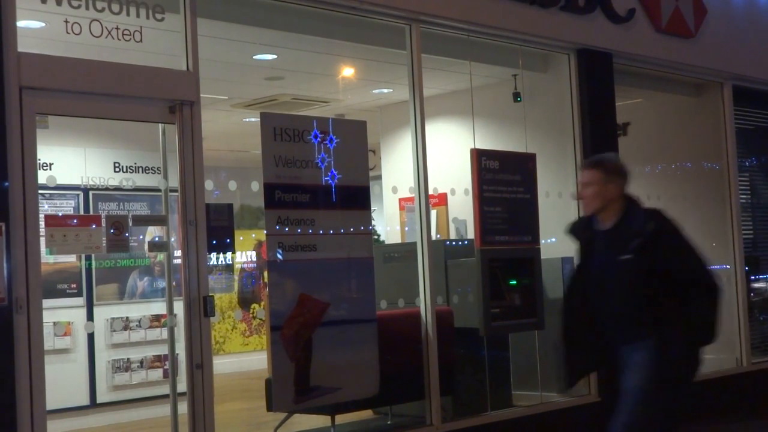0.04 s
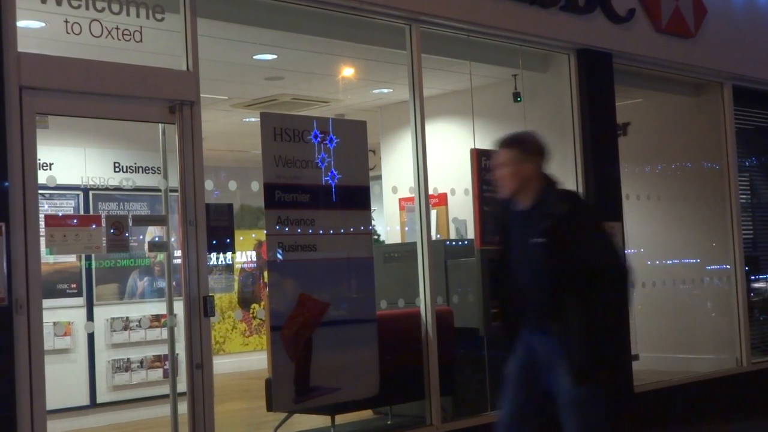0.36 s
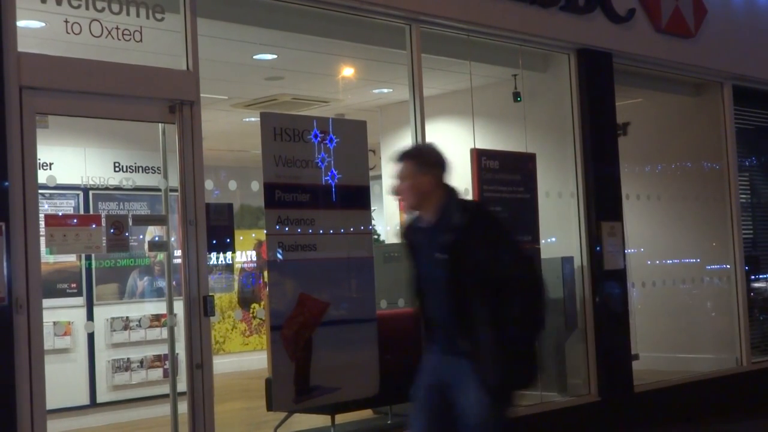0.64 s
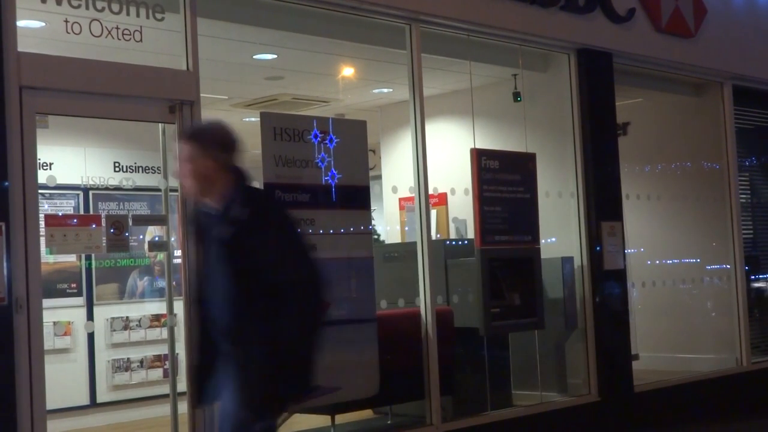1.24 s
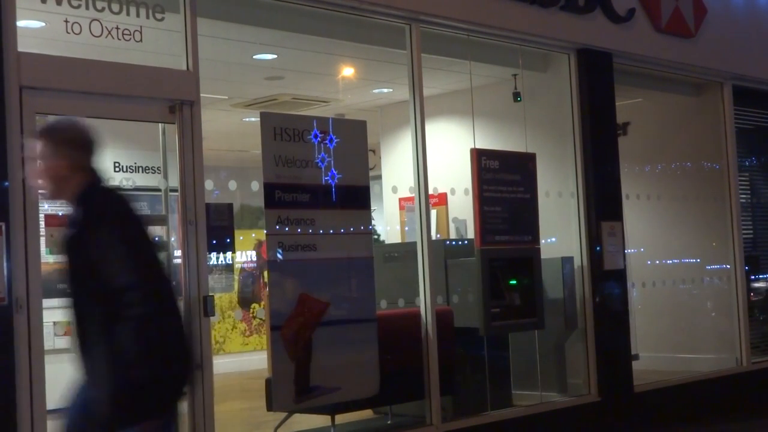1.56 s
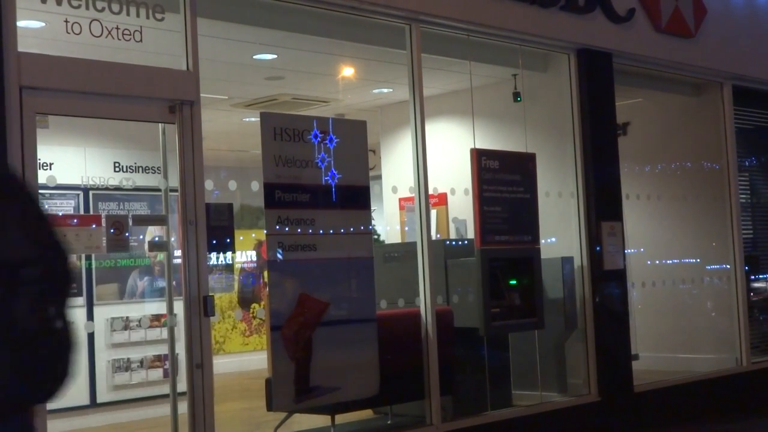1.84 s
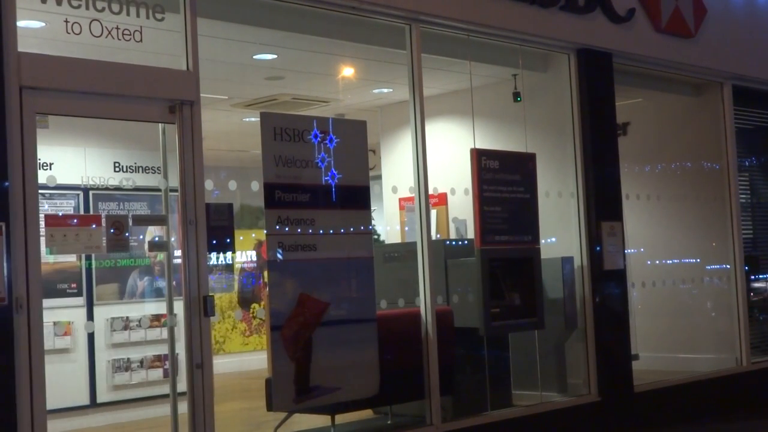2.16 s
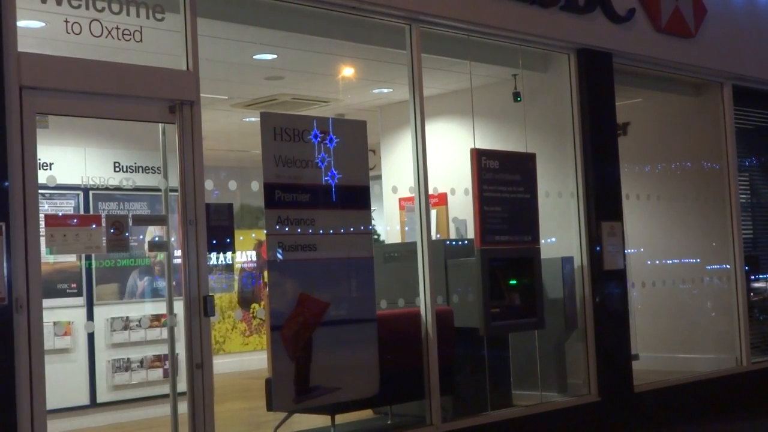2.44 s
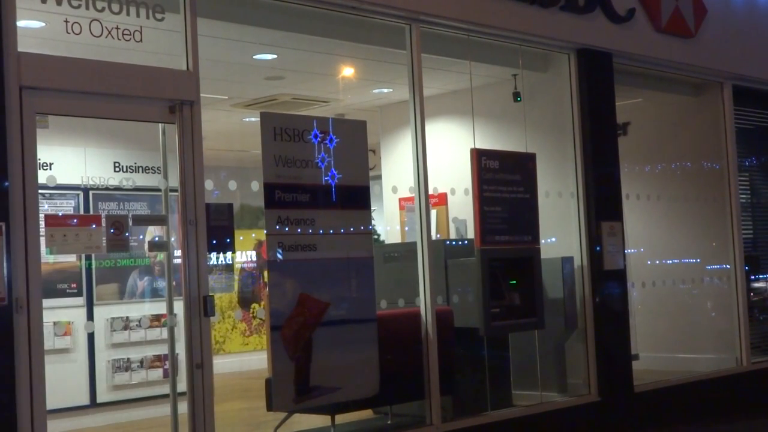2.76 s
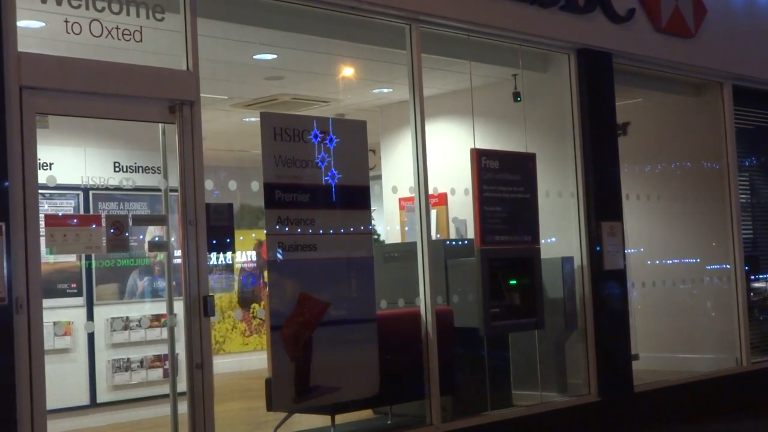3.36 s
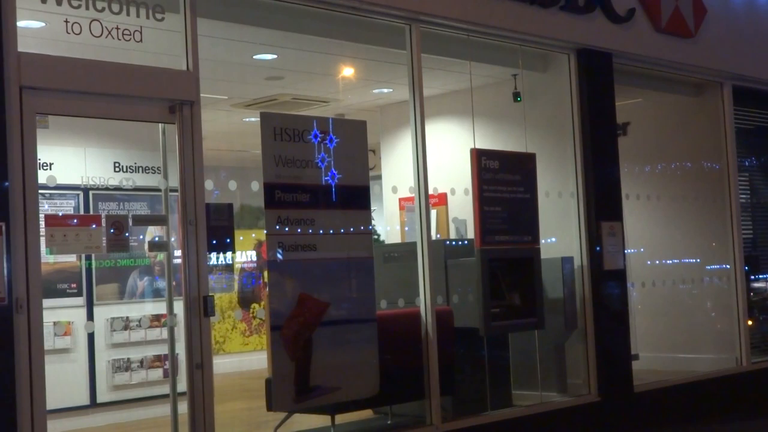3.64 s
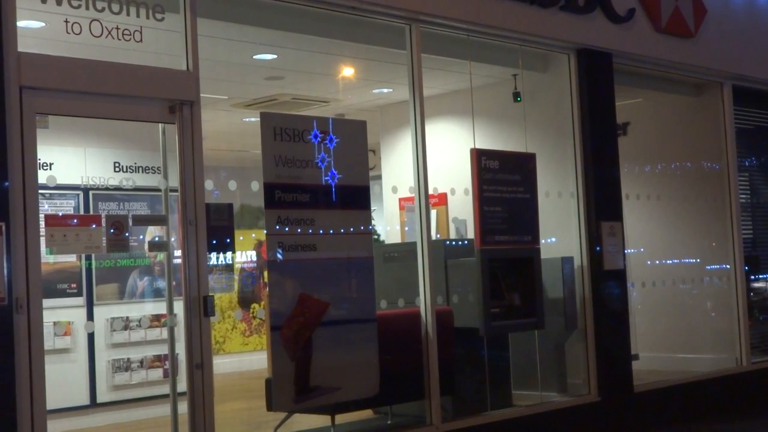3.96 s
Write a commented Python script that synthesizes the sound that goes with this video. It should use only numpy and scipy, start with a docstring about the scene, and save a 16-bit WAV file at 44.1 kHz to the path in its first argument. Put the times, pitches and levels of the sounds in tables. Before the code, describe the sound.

One sharp bang, like a heavy door slamming with a brief rattle, sounds on a quiet night street. Before it, a car's faint tyre noise fades away over the low drone of distant traffic.

```python
"""A bang on a night street

Outside a shop front, a car's tyre noise fades away over the low drone of far traffic and a faint hiss.
Something heavy and out of sight, perhaps a door, bangs shut once: it catches, slams home and rebounds
softly. Each contact makes its panel rattle and ring, and the whole panel wobbles with a low boom.
The buildings along the street add a faint echo."""
import sys
import numpy as np
from scipy import signal
from scipy.fft import rfft, irfft
from scipy.io import wavfile

SR = 44100
rng = np.random.default_rng(int(sys.argv[2]) if len(sys.argv) > 2 else 0)


def wrap_up_sound(samples):
    """Save the sound to the file named by the first command line argument, as 16-bit audio."""
    columns = np.atleast_2d(samples).T
    # keep every value between -1 and 1, then stretch to whole-number steps
    tamed = np.clip(columns, -1, 1)
    steps = np.round(tamed * 32767).astype(np.int16)
    wavfile.write(sys.argv[1], SR, steps)


N = 176400
T = np.arange(N) / SR

# tone colour of the faint hiss: f/Hz, relative level/dB
HISS_COLOUR = [(500, -1.5), (2000, -1), (4000, -4.5), (8000, -9), (15000, -15)]
# tone colour of the town's rumble: f/Hz, relative level/dB
RUMBLE_COLOUR = [(25, -18), (55, -6.5), (110, 5), (300, -4), (600, -14.5), (1500, -8), (4000, -25.5)]
# the far traffic's drone: f/Hz, width/Hz, level/dB
DRONE_BANDS = [(184.2, 29.2, -63.5), (227.7, 26.3, -64.5)]
# how the drone wavers: t/s, level change/dB
DRONE_WAVER = [(0, 0), (.3, 2), (.75, 2), (1.05, -0.5), (1.7, 0), (2.55, 0.5), (2.8, -3), (3.2, -0.5),
               (3.45, 3), (3.7, -1.5), (4, -2)]
# the car's tyres fading away: t/s, level/dB
CAR_FADE = [(0, -56.5), (.11, -59), (.17, -55.5), (.36, -60.5), (.46, -58.5), (.55, -60), (.66, -59),
            (1.0, -63), (1.5, -67), (2.1, -67), (2.7, -69), (4, -73.5)]
# tone colour of the tyre noise: f/Hz, relative level/dB
TYRE_COLOUR = [(30, -15), (70, -20.5), (140, -4), (450, 1.5), (600, -6), (850, -7), (1300, -13.5),
               (2300, -37.5), (4000, -40.5), (8000, -48.5)]
# pitches that stand out in the tyre noise: f/Hz, width/Hz, level against the rest/dB
TYRE_RESONANCES = [(386.6, 51, -10), (812, 116, -12.5), (3330, 400, -22.5)]
# tone colour of a far bump: f/Hz, relative level/dB
BUMP_COLOUR = [(30, -22), (80, -12), (130, 4), (230, -0.5), (550, 0.5), (900, -25), (1800, -42)]
# tone colour of the street's echo: f/Hz, relative level/dB
ECHO_COLOUR = [(100, -3.5), (400, 1.5), (1000, -5), (3000, -2.5), (6000, 3), (12000, -5)]
# how alike left and right are for sound from all around: f/Hz, likeness (1 = the same)
STREET_STEREO = [(100, 1), (220, 0.99), (450, 0.67), (1000, 0.046), (2000, -0.49), (4000, 0.34),
                 (8000, 0.6), (12000, 1)]
# how alike left and right are for the panel's rattle: f/Hz, likeness
RATTLE_STEREO = [(120, .995), (450, 0.89), (1000, 0.85), (4000, 0.9)]
# the contacts in the bang: t/s, level/dB, rise/s, dull above f/Hz, treble loss/dB per octave
CONTACTS = [(2.964, -43, 0.0041, 900, -1), (2.9705, -25.5, 0.0057, 1090, 2.5),
            (2.9878, -26, 0.0011, 1000, -0.5), (2.9926, -23.5, 0.0023, 1300, 1.8),
            (3.007, -26, .005, 604, 2), (3.076, -36.5, 0.0065, 1090, 6), (3.091, -31.5, 0.0015, 444, 21),
            (3.118, -47, 0.0046, 440, 30)]
# tone colour of the rattle, a crowd of close tones: f/Hz, relative level/dB
RATTLE_COLOUR = [(90, -26), (190, -11), (450, -3), (950, -2), (1500, -8.5), (2700, -7.5), (4000, -17),
                 (6000, -24.5), (9000, -33), (15000, -55)]
# the panel's clear tones: f/Hz, relative level/dB, time to fade by 60 dB/s
RING_TONES = [(333.5, -18, 0.2), (430, -19, 0.19), (452.6, -15, 0.091), (516, -7.5, .1), (574, -8.5, .1),
              (626, -11.5, 0.092), (881, -10.5, 0.12), (930, -2.5, 0.067), (1066, -5, 0.055),
              (1179, -8, 0.074), (1387, -23, 0.078), (1543, -14.5, 0.14), (2250, -13, 0.095),
              (3875, -18, 0.037)]
# the whole panel's low tones: f/Hz, level before the bass cut/dB
BOOM_TONES = [(99, -42.5), (127, -36.5), (163, -46.5)]
# how much louder the left microphone is: f/Hz, left minus right level/dB
MIC_BALANCE = [(100, -1), (220, -0.7), (450, -2), (1000, -1.5), (2000, 0.5), (5000, -.7), (12000, 0)]
# how far the left microphone's wave is ahead: f/Hz, phase/rad
MIC_LEAD = [(200, 0), (450, 0.064), (1000, 0.43), (2000, .3), (5000, 0.11), (10000, 0)]


def from_db(db):
    """Turn decibels into a factor to multiply by."""
    return 10 ** (np.asarray(db) / 20)


def unit_power(x):
    """Scale a sound to an average power of one."""
    return x / np.sqrt(np.mean(x ** 2) + 1e-20)


def at_hz(table, hz):
    """Read between a table's rows, with octaves evenly spaced."""
    freqs, values = np.transpose(table)
    return np.interp(np.log(hz), np.log(freqs), values)


def butter(x, hz, kind, order=2):
    """A smooth filter; a higher order cuts more steeply."""
    return signal.sosfilt(signal.butter(order, hz, kind, fs=SR, output="sos"), x + 1e-18)


def swell(t, rise_s, fade_s):
    """A straight rise, then a fall of 60 dB every fade_s seconds."""
    return np.clip(t / rise_s, 0, 1) * from_db(-60 * np.maximum(t - rise_s, 0) / fade_s)


def delayed(x, start_s):
    """Place a sound at its time in the scene."""
    return np.pad(x, ((0, 0), (int(start_s * SR), N)))[:, :N]


def stereo(mid, side, likeness):
    """Mix two noises into left and right channels of the given likeness."""
    alike = np.clip(likeness, -1, 1)
    return (np.sqrt(1 + alike) * mid + np.sqrt(1 - alike) * side * np.array([[1], [-1]])) / np.sqrt(2)


def noise_bands(colour, size):
    """Half-octave bands as (Hz, two noises); together they have a power of about one."""
    edges = 22 * 2 ** np.arange(0, 9.6, .5)
    centres = np.sqrt(edges[1:] * edges[:-1])
    white = rng.standard_normal((2, 2, size + 8000))
    gains = from_db(at_hz(colour, centres))
    gains /= np.sqrt(np.sum(gains ** 2 * np.diff(edges)) * 2 / SR)
    return [(hz, gains[k] * butter(white[k % 2], edges[k:k + 2], "band", order=3)[:, -size:])
            for k, hz in enumerate(centres)]


def wide_noise(colour, size=N):
    """Steady noise from all around, in the given tone colour."""
    return sum(stereo(*pair, at_hz(STREET_STEREO, hz)) for hz, pair in noise_bands(colour, size))


def narrow_noise(hz, width):
    """Stereo noise close to one pitch, with a power of one."""
    pair = butter(rng.standard_normal((2, N + SR)), [hz - width / 2, hz + width / 2], "band")[:, SR:]
    return unit_power(stereo(*pair, at_hz(STREET_STEREO, hz)))


def hiss():
    """A faint, steady hiss."""
    return from_db(-71.5) * wide_noise(HISS_COLOUR)


def town_rumble():
    """The town's steady low noise."""
    return from_db(-72.5) * wide_noise(RUMBLE_COLOUR)


def far_traffic():
    """Distant traffic drones in two narrow bands and wavers in level."""
    drone = sum(from_db(db) * narrow_noise(hz, width) for hz, width, db in DRONE_BANDS)
    return from_db(np.interp(T, *np.transpose(DRONE_WAVER))) * drone


def far_bump(start_s=0.12):
    """One dull bump, perhaps the car's wheels on the road."""
    return from_db(-53.5) * swell(T - start_s, rise_s=.04, fade_s=1) * wide_noise(BUMP_COLOUR)


def leaving_car():
    """Rolling tyres grow quieter as the car drives away."""
    peaks = sum(from_db(db) * narrow_noise(hz, width) for hz, width, db in TYRE_RESONANCES)
    tyres = unit_power(wide_noise(TYRE_COLOUR) + peaks)
    return from_db(np.interp(T, *np.transpose(CAR_FADE))) * tyres


def street_echo(sound, level_db=-26):
    """Sound bounces off the buildings and blurs into a faint tail."""
    tail = wide_noise(ECHO_COLOUR, size=SR) * swell(T[:SR], rise_s=0.016, fade_s=0.97)
    return from_db(level_db) * signal.fftconvolve(sound, unit_power(tail) / np.sqrt(SR), axes=1)[:, :N]


def strength(hz, db, corner_hz, dull_db):
    """How hard a contact drives a frequency: soft contacts lose the treble."""
    return from_db(db - dull_db * max(np.log2(hz / corner_hz), 0))


def panel_boom(start_s=3.006, rise_s=0.0177, gap_s=0.053, loss_db=9.5):
    """The whole panel swings three times after the slam, weaker each time."""
    t = T - start_s
    swings = sum(from_db(-loss_db * k) * swell(t - gap_s * k, rise_s, fade_s=0.15) for k in range(3))
    return swings * sum(from_db(db) * np.sin(2 * np.pi * hz * (t - rise_s)) for hz, db in BOOM_TONES)


def panel_ring(trim_db=-3.5, scatter_db=2.5):
    """Every contact rings the panel's clear tones, each with a partly random strength."""
    ring = 0
    for hz, tone_db, fade_s in RING_TONES:
        tone = np.sin(2 * np.pi * (hz * T + rng.random()))
        for start_s, db, rise_s, corner_hz, dull_db in CONTACTS:
            hit_db = db + trim_db + tone_db + scatter_db * rng.standard_normal()
            ring += tone * strength(hz, hit_db, corner_hz, dull_db) * swell(T - start_s, rise_s, fade_s)
    return ring


def panel_rattle(db, rise_s, corner_hz, dull_db, trim_db=-1.5):
    """One contact rings so many close tones that they blur into a short burst of noise."""
    t = T[:SR // 2]
    rattle = 0
    for hz, pair in noise_bands(RATTLE_COLOUR, size=len(t)):
        fade_s = .11 / (hz / 1000) ** 0.13  # high tones die sooner
        envelope = strength(hz, db + trim_db, corner_hz, dull_db) * swell(t, rise_s, fade_s)
        rattle += envelope * stereo(*pair, at_hz(RATTLE_STEREO, hz))
    return rattle


def panel_bang(bass_cut_hz=114):
    """Quick contacts make one bang of rattle, ring and boom; the panel gives off no deep bass."""
    rattle = sum(delayed(panel_rattle(*contact), start_s) for start_s, *contact in CONTACTS)
    return butter(rattle + panel_ring() + panel_boom(), bass_cut_hz, "high", order=5)


def scene():
    """The bang and its echo over the sounds of the street."""
    bang = panel_bang()
    return bang + street_echo(bang) + leaving_car() + far_bump() + far_traffic() + town_rumble() + hiss()


def record(dry):
    """Two microphones differ a little in level and timing; the highest treble is cut steeply."""
    hz = np.maximum(np.fft.rfftfreq(N + SR, 1 / SR), 1)
    half = np.array([[.5], [-.5]])  # each side takes half of the difference
    mics = from_db(half * at_hz(MIC_BALANCE, hz)) * np.exp(1j * half * at_hz(MIC_LEAD, hz))
    heard = irfft(rfft(dry, N + SR) * mics, N + SR)[:, :N]
    treble_cut = signal.ellip(12, .1, 80, 15700, fs=SR, output="sos")  # above 15700 Hz
    return signal.sosfilt(treble_cut, heard)


dry = scene()
out = record(dry)
wrap_up_sound(out)
```